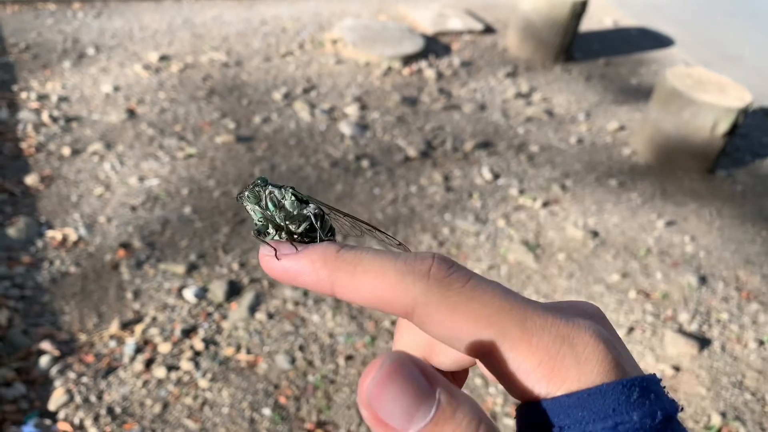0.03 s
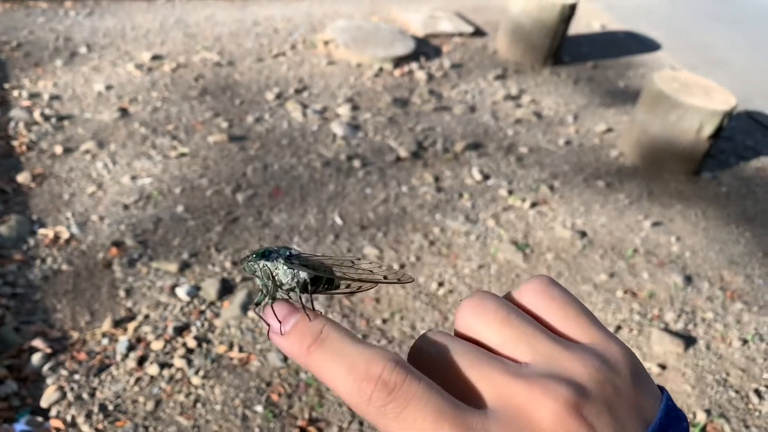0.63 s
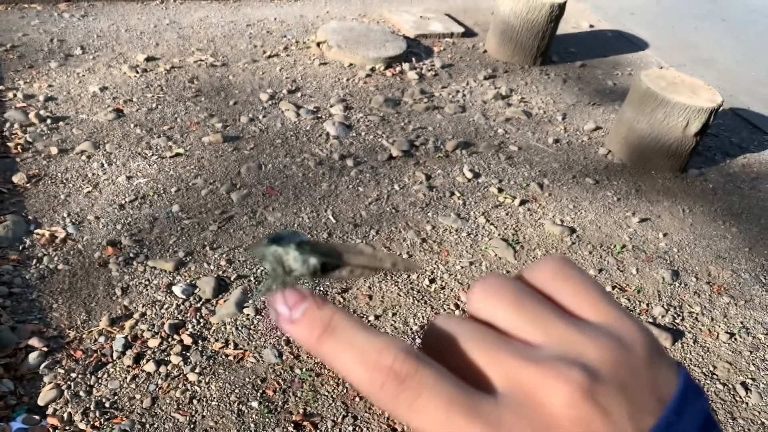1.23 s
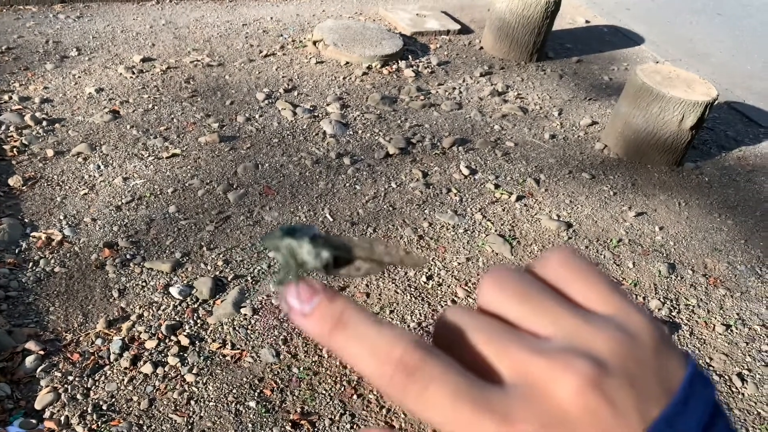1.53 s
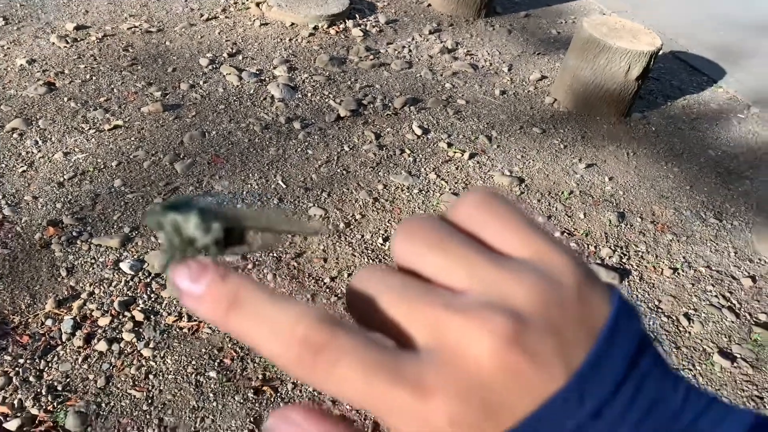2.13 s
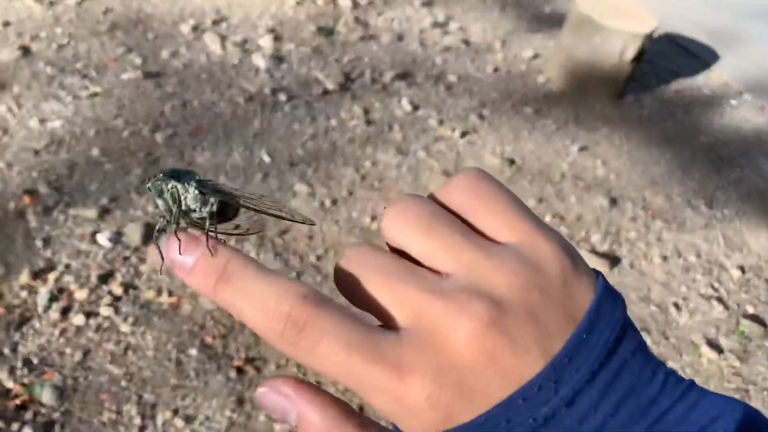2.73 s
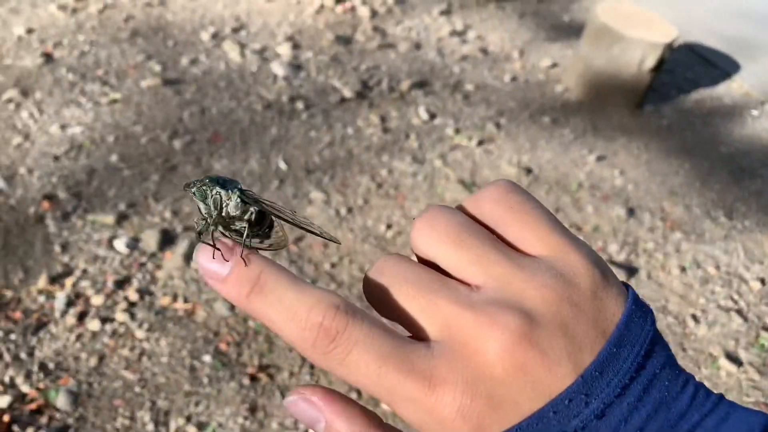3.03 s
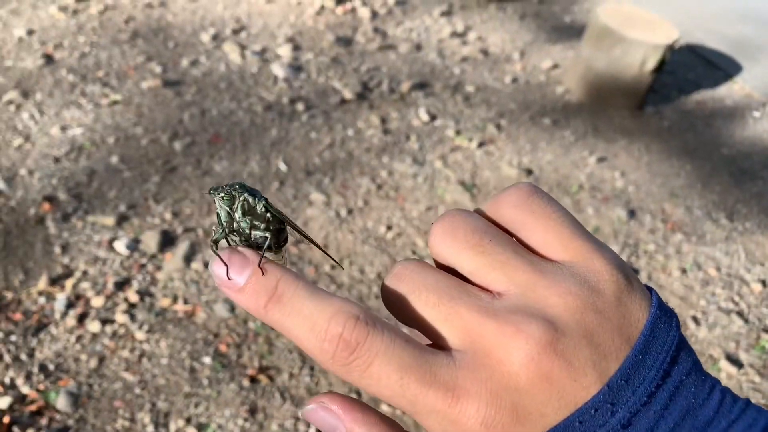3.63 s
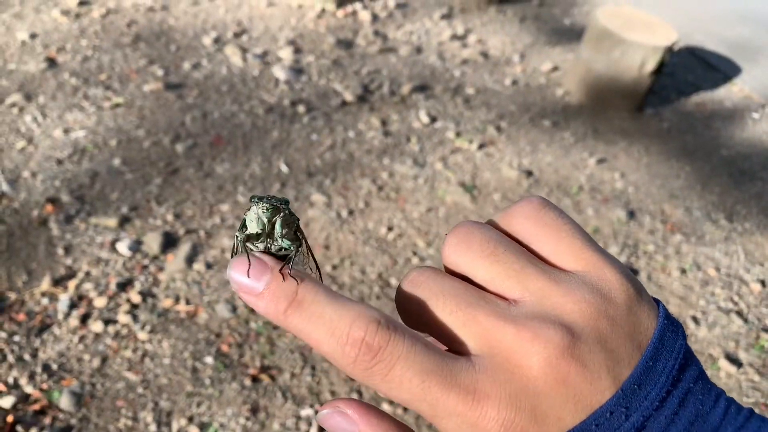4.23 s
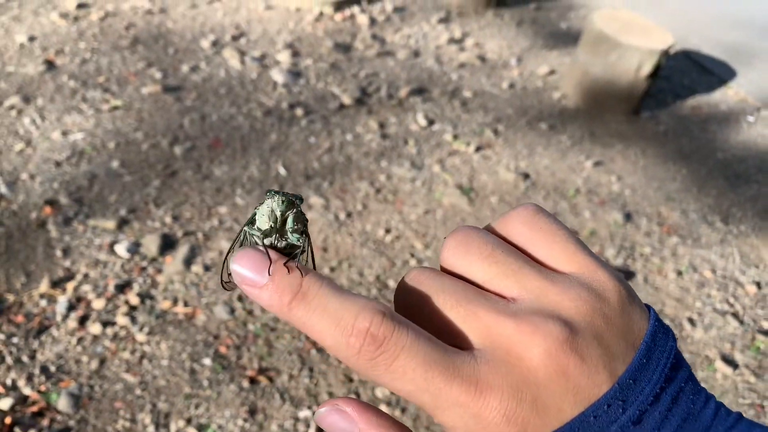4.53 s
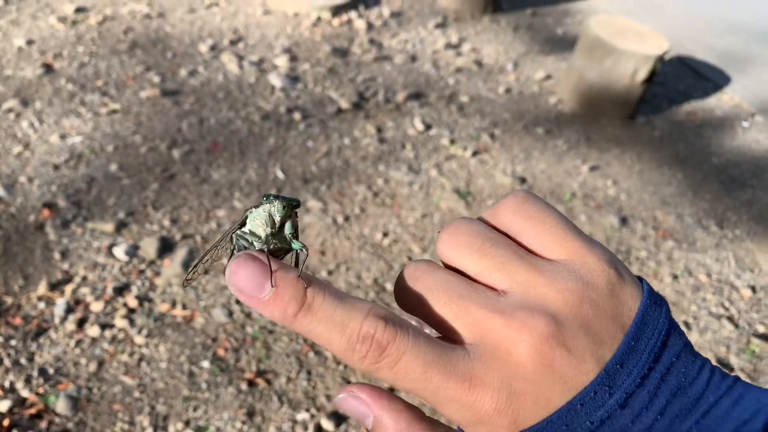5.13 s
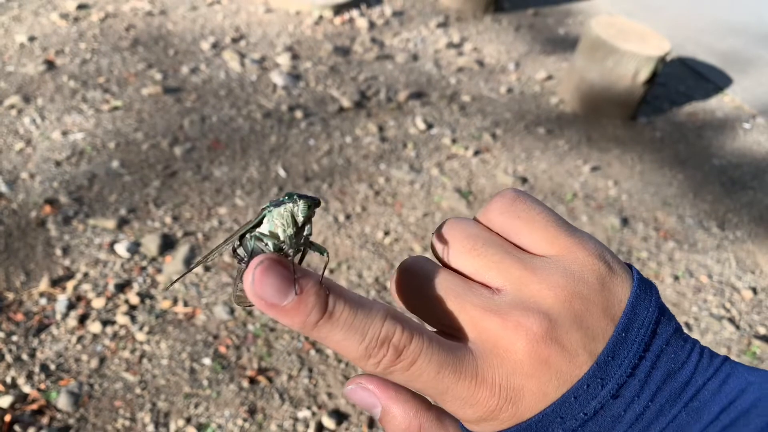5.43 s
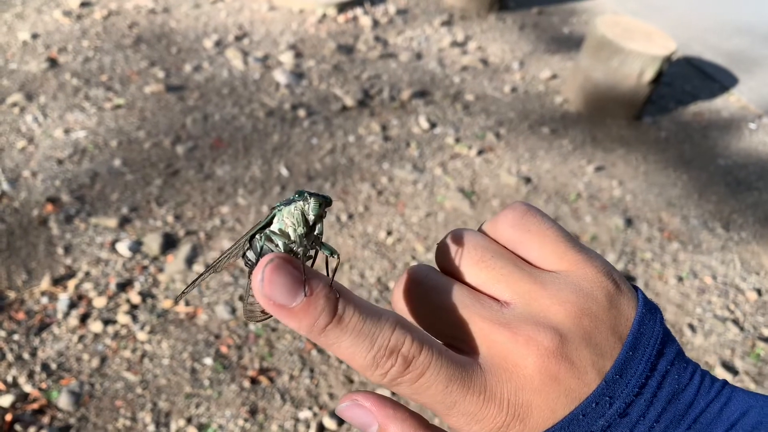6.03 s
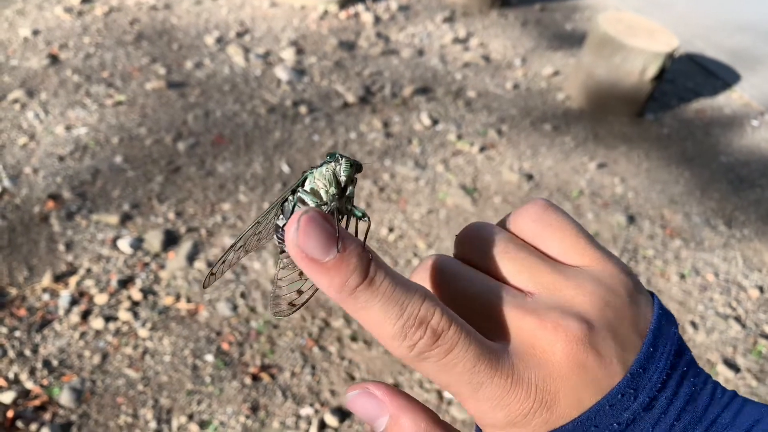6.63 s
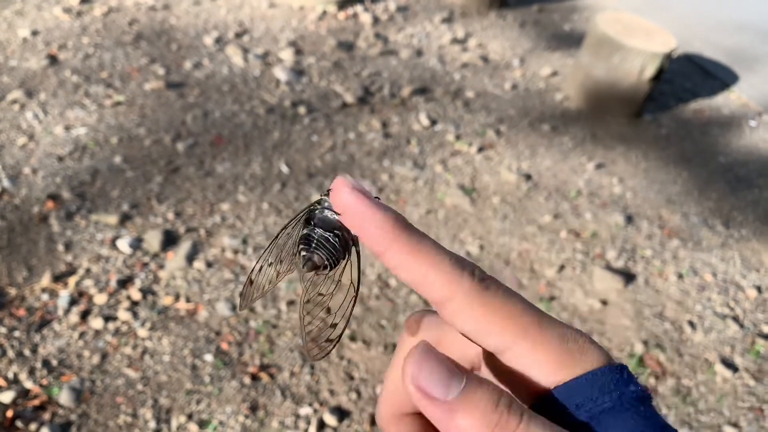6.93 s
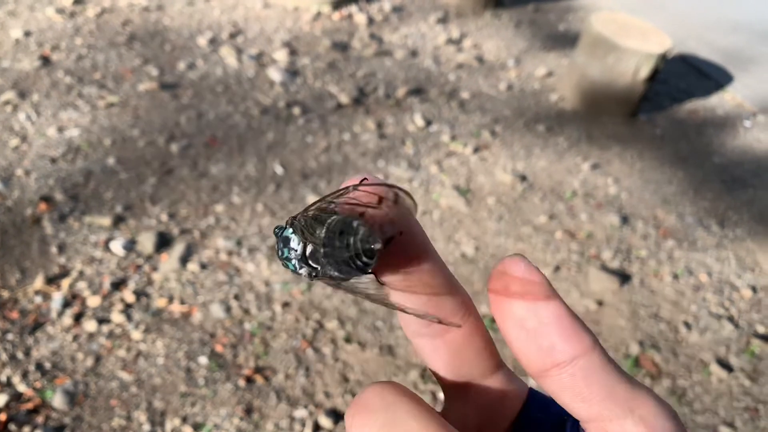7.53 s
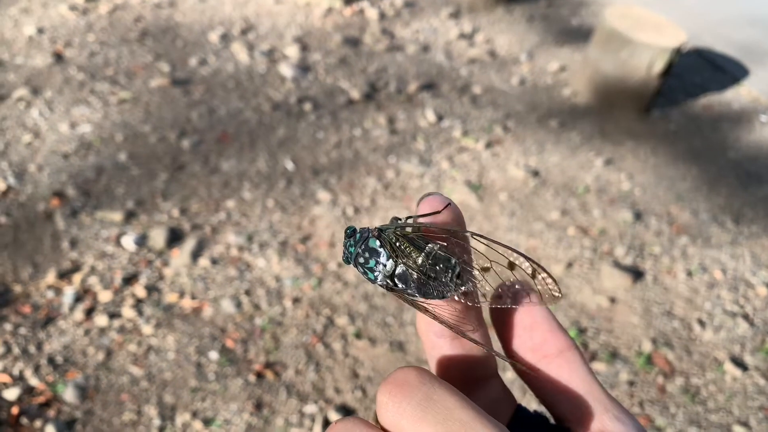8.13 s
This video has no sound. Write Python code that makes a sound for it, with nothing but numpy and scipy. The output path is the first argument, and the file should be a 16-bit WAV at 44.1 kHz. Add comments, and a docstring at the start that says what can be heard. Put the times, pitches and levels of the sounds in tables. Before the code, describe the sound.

A dense, shrill chorus of distant cicadas buzzes and hisses outdoors for the whole eight and a half seconds, over very faint low air. One cicada close by drones, swells and drones again in the first 0.7 seconds, then pauses. At 1.7 seconds a finger makes one dull knock on the microphone. From about 2.1 to 4.4 seconds the close cicada quickly alternates sizzling drones with ringing swells that glide upward, then trails off in a ragged rattle, gone by 5.6 seconds. A second cicada, a little further off, pulses five short, high sizzling bursts between 4.4 and 7.7 seconds. The close one returns at 6.6 seconds with a rising whine, then more drones and swells, with its sharpest sizzle around 8 seconds. Faint, dry microphone crackle comes and goes with the sizzling, most noticeably near the end.

```python
"""A shrill wall of summer cicadas around a gravel yard, one male close by, trading drones and swells.
His two tymbals buckle in turn. As he lifts his abdomen its ring climbs from 2.6 to 4 kHz or more;
in the drones the tymbals' bare sizzle takes over, and one song runs out in a fading rattle.
A neighbour pulses against him and a far chorus fills the air. The microphone crackles on the
sharpest sizzle, and a finger knocks its housing once."""
import sys
import numpy as np
from scipy import signal
from scipy.fft import rfft, irfft, next_fast_len
from scipy.io import wavfile
from scipy.ndimage import uniform_filter1d, minimum_filter1d

SR = 44100
rng = np.random.default_rng(int(sys.argv[2]) if len(sys.argv) > 2 else 0)


def transcribe(u):
    """Save the signal u as a 16-bit wav file named by the first command-line argument.

    u: samples, shape (n,) or (channels, n), limited to [-1, 1]; the rate is SR.
    q: integer samples, one column per channel.
    """
    v = np.clip(np.atleast_2d(u).T, -1, 1)
    q = np.round(v * 32767).astype(np.int16)
    wavfile.write(sys.argv[1], SR, q)


N = 369999
TIME = np.arange(N) / SR

# Tone curves, all with the columns: frequency_hz, relative_db
AIR_EQ = [(20, 7), (60, -1.5), (180, 1), (350, -4), (800, -7.5), (1500, -7), (4000, -28)]   # low outdoor air
CHORUS_BUZZ_EQ = [(1000, -71), (1700, -35), (2300, -25.5), (3000, -12.5), (3600, -4), (4200, 2.5),
                  (4900, 3), (5400, 1.5), (5850, -4), (6600, 2.5), (7300, -4.5), (8400, -18.5),
                  (10000, -20), (14000, -50)]   # the far males' buzz
CHORUS_SIZZLE_EQ = [(6000, -54), (8600, -25.5), (9800, -15), (10800, -8.5), (12500, -2.5), (14200, 2),
                    (15600, 2.5), (17000, 2)]   # their high sheen
CRACKLE_EQ = [(20, 6), (120, 4), (172, 7), (250, 5), (345, 2), (520, 4.5), (700, 3.5), (1500, 3.5),
              (3000, -2.5), (6000, -3.5), (12000, -14)]   # the microphone's dry crackle
NEIGHBOUR_SIZZLE_EQ = [(6000, -46), (10000, -15.5), (11300, -10), (12300, 1.5), (13300, -1), (14400, 3),
                       (15500, 4.5), (17000, -3.5)]   # the neighbour's bare tymbals
NEIGHBOUR_RING_EQ = [(2000, -54.5), (3500, -14.5), (4400, 0), (5000, -0.5), (5900, -13), (6500, -5),
                     (6950, 4.5), (7600, -26), (9000, -28)]   # his abdomen
NEAR_SIZZLE_EQ = [(6000, -65), (9300, -15), (10500, -8), (11700, 1), (13000, 1), (14300, 5.5), (15500, 4),
                  (17000, -0.5)]   # the near male's bare tymbals
NEAR_HUM_EQ = [(100, -16), (175, -28), (345, 6.5), (520, -12), (690, -2), (1030, 12), (1350, -24),
               (2000, -18), (4000, -24)]   # the reedy hum under them

# Fader moves of the far chorus: time_s, buzz_db, sizzle_db
CHORUS_LEVELS = [(0, -21.5, -17), (.45, -21, -17.5), (.9, -20.5, -17.5), (1.6, -21.3, -20),
                 (2.1, -22.5, -20.5), (2.9, -22, -19.5), (3.45, -21.5, -18), (3.85, -22.5, -16),
                 (4.3, -20, -19.5), (4.9, -21.5, -18.5), (5.35, -21.5, -19), (5.75, -21, -19),
                 (6.1, -23.3, -17), (6.4, -22.5, -20), (7.1, -22.5, -19), (7.5, -22, -16.5),
                 (7.9, -22.5, -17.5), (8.39, -21.5, -19.5)]
# Spells of microphone crackle: start_s, end_s, level_db
CRACKLE_SPELLS = [(.21, .26, -54), (0.623, 0.716, -46.5), (3.408, 3.46, -40.5), (3.479, 3.63, -46.5),
                  (3.793, 3.835, -49.5), (4.56, 4.732, -59.5), (5.299, 5.573, -44), (6.821, 7.02, -47),
                  (7.132, 7.17, -50), (7.548, 7.647, -53.5), (7.909, 8.181, -34.5), (8.3, 8.421, -46.5)]
# The neighbour's bursts of sizzle: start_s, end_s, buckles_per_s (each tymbal), level_db
NEIGHBOUR_BURSTS = [(4.357, 4.82, 167, -17.5), (5.15, 5.613, 159, -12.5), (5.858, 6.296, 155, -18),
                    (6.699, 7.071, 160, -14.5), (7.42, 7.659, 153, -13.5)]
# The near male's drones, abdomen relaxed: start_s, end_s, buckles_per_s (each tymbal), abdomen_db,
# sizzle_db, rib_ring_hz, rib_ring_db, whistle_db (relative to the sizzle)
NEAR_DRONES = [(-.1, 0.287, 177, -38.5, -14, 11840, -33, -14),
               (0.518, 0.741, 164.8, -38.5, -12.5, 14200, -27, -13),
               (2.135, 2.279, 126, -39.5, -45, 9800, -45, -20),
               (2.748, 3.107, 163, -40.5, -21.5, 10300, -33.5, -12),
               (3.332, 3.661, 164, -40.5, -13.5, 10380, -42, -6),
               (3.9, 4.219, 173.1, -43, -10, 11120, -31, -26),
               (6.591, 6.698, 171, -45, -43, 9764, -43, -20),
               (7.259, 7.649, 171.5, -38, -27, 10400, -36, -15),
               (7.88, 8.191, 159, -35.5, -6, 12270, -28, 8)]
# His swells, abdomen lifted: start_s, end_s, first_buckles_per_s, last_buckles_per_s,
# lead_cycles (how early the second tymbal comes), abdomen_hz, abdomen_db, whine_hz, whine_db,
# whine_db_per_s, upper_ring_db, top_ring_db
NEAR_SWELLS = [(0.252, 0.545, 165.9, 160, 0.026, 4630, -20.5, 4760, -22, 33, -23.5, -38),
               (2.22, 2.791, 165.5, 174.7, .021, 4330, -23.5, 4625, -17.5, -12, -21, -30),
               (3.059, 3.377, 167.7, 171.9, 0.027, 4300, -22, 4590, -24, -11, -21.5, -31.5),
               (3.622, 3.952, 172.3, 173.8, 0.021, 4460, -19, 4720, -28, -5, -20, -28),
               (4.173, 4.442, 167.2, 159.9, 0.026, 4390, -24.5, 4197, -21, -25, -28, -32),
               (6.631, 7.302, 165.4, 175, 0.014, 3998, -22.5, 4970, -15, 50, -20, -22),
               (7.604, 7.933, 170.8, 174.3, 0.016, 4310, -17, 4690, -18, 17, -27, -24),
               (8.159, 8.473, 174, 175.2, 0.018, 4520, -11.5, 4754, -22, 38, -19.5, -23)]

LIFT_S, DROP_S = .094, .08   # the abdomen rises and falls back
DRONE_FADE_S = .039


def from_db(db):
    """Decibels to gain."""
    return 10 ** (np.asarray(db) / 20)


def unit_rms(x):
    """Set the overall level to 1."""
    return x / np.sqrt(np.mean(x ** 2) + 1e-20)


def levelled(x):
    """Hold the running level at 1."""
    return x / np.sqrt(np.maximum(uniform_filter1d(x * x, size=1500), 1e-14))


def automation(rows):
    """One curve per column, in straight lines between the times in the first."""
    times, *columns = np.transpose(rows)
    return [np.interp(TIME, times, column) for column in columns]


def held(starts, values):
    """Each value lasts until the next start."""
    return values[np.maximum(np.searchsorted(starts, TIME) - 1, 0)]


def drift(turns_per_s):
    """A random wander with a spread near 1."""
    knots = rng.standard_normal(4000)
    return np.interp(TIME * turns_per_s, np.arange(len(knots)), knots)


def gate(start, end, attack_s, release_s):
    """Rise from 0, hold at 1, fall back."""
    return np.clip(np.minimum((TIME - start) / attack_s, (end - TIME) / release_s), 0, 1)


def notes(starts, ends, levels_db, attack_s, release_s, db_per_s):
    """Envelope of a row of notes; each ramps in dB, with its level set at the louder end before fades."""
    gain = np.zeros(N)
    for start, end, db, slope in np.broadcast(starts, ends, levels_db, db_per_s):
        on = slice(*np.searchsorted(TIME, [start, end]))
        growth_db = slope * (TIME[on] - (end if slope > 0 else start))
        gain[on] += gate(start, end, attack_s, release_s)[on] * from_db(db + growth_db)
    return gain


def eq(x, curve):
    """Apply a tone curve drawn on a log-frequency axis."""
    size = next_fast_len(N + 2000)
    hz, db = np.transpose(curve)
    bins_hz = np.maximum(np.arange(size // 2 + 1) * SR / size, 1)
    gain = from_db(np.interp(np.log(bins_hz), np.log(hz), db))
    return irfft(rfft(x, size) * gain, size)[:N]


def resonance(x, centre_hz, width_hz, order):
    """A ringing band whose centre may glide, held at level 1."""
    carrier = np.exp(2j * np.pi * np.cumsum(centre_hz * np.ones(N)) / SR)
    lowpass = signal.butter(order, width_hz / 2, fs=SR, output="sos")
    return levelled(np.real(carrier * signal.sosfilt(lowpass, x / carrier + 1e-18)))


def tymbals(rate, jitter_s, uneven_db, offset_cycles=.48, second_db=-3.5):
    """Left and right tymbal buckle in turn, the second one weaker; one click a buckle."""
    cycles = np.cumsum(rate) / SR
    beats = np.arange(1, int(cycles[-1]) + 1)
    train, taps = np.zeros(N), np.arange(-5, 7)
    for shift, db in ((0, 0), (offset_cycles, second_db)):
        slip, accent = rng.standard_normal((2000, 2))[:len(beats)].T
        due_s = np.interp(beats + np.interp(beats, cycles, shift * np.ones(N)), cycles, TIME)
        position = SR * (due_s + slip * np.interp(due_s, TIME, jitter_s * np.ones(N)))
        samples = position.astype(int)[:, None] + taps
        gap = samples - position[:, None]
        click = np.sinc(gap) * np.cos(np.pi * gap / len(taps))   # lands cleanly between samples
        np.add.at(train, np.clip(samples, 0, N - 1), click * from_db(db + uneven_db * accent)[:, None])
    return train


def ribs(clicks, ring_s, rough):
    """Each buckle sets the ribbed membrane crackling for about a millisecond, never quite the same."""
    fade = np.exp(-TIME[:256] / ring_s)
    # the ribs smear each click in time but leave its spectrum flat
    smear = rfft(np.roll(fade * rng.standard_normal(len(fade)), 32))
    snap = signal.oaconvolve(clicks, irfft(smear / np.abs(smear)))[32:N + 32]
    grit = signal.oaconvolve(clicks, fade)[:N] * rng.standard_normal(N)
    return unit_rms(snap) + rough * unit_rms(grit)


def small_body(x):
    """So small a body radiates little bass."""
    return signal.sosfilt(signal.butter(2, 1400, "high", fs=SR, output="sos"), x + 1e-18)


def trees(x, wet_db, decay_s=.2):
    """Ground, trunks and leaves scatter a short diffuse tail."""
    age_s = TIME[:SR // 2]
    tail = rng.standard_normal(len(age_s)) * from_db(-60 * age_s / decay_s) * (age_s > .003)
    return x + from_db(wet_db) * signal.oaconvolve(x, tail / np.linalg.norm(tail))[:N]


def air():
    """A faint, low bed of outdoor air."""
    return from_db(-64.5) * unit_rms(eq(rng.standard_normal(N), AIR_EQ))


def far_chorus(males=8):
    """Far males swell and fade at their own wandering tempos, blurred by the trees into a pitched hiss."""
    tempos = [rate * (1 + .02 * drift(2.7)) for rate in np.linspace(152, 186, males)]
    voices = sum(tymbals(rate, jitter_s=8e-6, uneven_db=4.5) * from_db(2 * drift(2.51))
                 for rate in tempos)
    crowd = levelled(unit_rms(trees(voices, wet_db=5)) + 1.03 * rng.standard_normal(N))
    buzz_db, sizzle_db = automation(CHORUS_LEVELS)
    buzz = from_db(buzz_db) * unit_rms(eq(crowd, CHORUS_BUZZ_EQ))
    sizzle = from_db(sizzle_db) * unit_rms(eq(crowd, CHORUS_SIZZLE_EQ))
    return buzz + sizzle


def finger_knock(at_s=1.719, level_db=-26.5):
    """A finger lands one dull knock on the microphone's housing."""
    tap = 1e-18 + (np.arange(N) == int(at_s * SR))
    thud = signal.lfilter(*signal.butter(1, 130, fs=SR), tap)
    thud = signal.lfilter(*signal.butter(2, 1800, fs=SR), thud)
    return from_db(level_db) * thud / thud.max()


def microphone_crackle(near_rate):
    """Spells of low, dry crackle at the tempo of whichever male is sizzling."""
    in_burst = [(TIME > start) & (TIME < end) for start, end, *_ in NEIGHBOUR_BURSTS]
    rate = np.select(in_burst, [per_s for _, _, per_s, _ in NEIGHBOUR_BURSTS], near_rate)
    pops = tymbals(rate, jitter_s=3.5e-4, uneven_db=3.5, second_db=-10)
    pops = levelled(pops * (1 + .8 * drift(400)))
    spells = notes(*np.transpose(CRACKLE_SPELLS), attack_s=.022, release_s=.022, db_per_s=14)
    return spells * unit_rms(eq(pops, CRACKLE_EQ))


def neighbour(release_s=.065, ring_s=.35, ring_db=-25):
    """A slower male, further off: bursts of tymbal sizzle, each handing over to his ringing abdomen."""
    start, end, rate, burst_db = np.transpose(NEIGHBOUR_BURSTS)
    clicks = tymbals(held(start, rate) * (1 + .012 * drift(8)), jitter_s=3e-6, uneven_db=.5)
    membrane = trees(ribs(clicks, ring_s=.0004, rough=.35), wet_db=-6)
    bursts = notes(start, end, burst_db, attack_s=.15, release_s=release_s, db_per_s=-5.5)
    tails = sum(gate(stop - release_s, stop + ring_s, attack_s=.09, release_s=.09) for stop in end)
    sizzle = bursts * levelled(eq(membrane, NEIGHBOUR_SIZZLE_EQ))
    ring = from_db(ring_db) * tails * levelled(eq(membrane, NEIGHBOUR_RING_EQ))
    return sizzle + ring


def closing_rattle(start_s=4.33, end_s=5.58, buckles_per_s=138, sag_hz_per_s=300):
    """The near song runs out in slow, ragged beats, the tymbals nearly together, as the abdomen sags."""
    rate = buckles_per_s * (1 + .015 * drift(12))
    clicks = small_body(tymbals(rate, jitter_s=1.2e-4, uneven_db=1.5, offset_cycles=.2))
    abdomen_hz = 4245 - sag_hz_per_s * np.clip(TIME - start_s, 0, 2)
    body = from_db(-21.5) * resonance(clicks, abdomen_hz, width_hz=500, order=3)
    upper = from_db(-30) * resonance(clicks, centre_hz=6860, width_hz=2500, order=3)
    return trees(gate(start_s, end_s, attack_s=.065, release_s=.87) * (body + upper), wet_db=-20)


def near_tempo(kick_per_s=6, kick_s=.08, settle_s=.17):
    """The near male's beat kicks as a swell opens, slides through it and settles in the next drone."""
    points = []
    for start, end, first, last, *_ in NEAR_SWELLS:
        points += [(start + kick_s / 10, first + kick_per_s), (start + kick_s, first)]
        points += [(end - DROP_S / 2, last)]
    for start, end, rate, *_ in NEAR_DRONES:
        points += [(min(start + settle_s, end - kick_s), rate), (end - kick_s, rate)]
    return automation(sorted(points))[0]


def abdomen_lift():
    """His abdomen drops to 0 for each drone and lifts back to 1 after it."""
    return 1 - sum(gate(start - DROP_S / 2, end + LIFT_S / 2, DROP_S, LIFT_S)
                   for start, end, *_ in NEAR_DRONES)


def drone_sizzle(clicks, release_s=.052):
    """The bare tymbals build through each drone, with a rib ring, a reedy hum and a strained whistle."""
    start, end, _, _, sizzle_db, rib_hz, rib_db, whistle_db = np.transpose(NEAR_DRONES)
    membrane = trees(ribs(clicks, ring_s=.0004, rough=.2), wet_db=-10)
    rib = resonance(membrane, held(start, rib_hz), width_hz=1000, order=2)
    rib *= notes(start, end, rib_db, DRONE_FADE_S, release_s, db_per_s=0)
    whistle = resonance(membrane, centre_hz=15470, width_hz=310, order=2)
    whistle *= from_db(held(start, whistle_db))
    sizzle = levelled(levelled(eq(membrane, NEAR_SIZZLE_EQ)) + whistle)
    hum = from_db(-48.5) * unit_rms(eq(clicks, NEAR_HUM_EQ))
    build = notes(start, end, sizzle_db, attack_s=.12, release_s=release_s, db_per_s=22.5)
    return rib + build * (sizzle + hum)


def abdomen_rings(drive, lift, drone_gain, rest_hz=2646, attack_s=.097, release_s=.098):
    """The abdomen carries the drone at rest and glides up as it lifts; higher rings join the swells."""
    (start, end, _, _, _, lifted_hz, body_db,
     whine_hz, whine_db, whine_db_per_s, upper_db, top_db) = np.transpose(NEAR_SWELLS)
    abdomen_hz = rest_hz + lift * (held(start, lifted_hz) - rest_hz)
    body = resonance(drive, abdomen_hz, width_hz=1040, order=3)
    body *= drone_gain + notes(start, end, body_db, attack_s, release_s, db_per_s=6)
    whine = resonance(drive, held(start, whine_hz), width_hz=180, order=2)
    whine *= notes(start + LIFT_S / 2, end - DROP_S / 2, whine_db, LIFT_S, DROP_S / 2, whine_db_per_s)
    upper_hz = 6544 + .05 * (abdomen_hz - 4200)   # barely follows the glide
    upper = resonance(drive, upper_hz, width_hz=425, order=2)
    upper += from_db(-20) * resonance(drive, centre_hz=9600, width_hz=270, order=2)   # its overtone
    upper *= notes(start, end, upper_db, attack_s=.079, release_s=.05, db_per_s=0)
    top = resonance(drive, centre_hz=7720, width_hz=630, order=3)
    top *= notes(start, end, top_db, attack_s, release_s, db_per_s=13)
    return body + whine + upper + top


def near_male(rate, rest_lead_cycles=.0318):
    """The lead voice: one click train drives the abdomen, the relaxed body's nasal tone and the sizzle."""
    lift = abdomen_lift()
    swell_start, _, _, _, swell_lead, *_ = np.transpose(NEAR_SWELLS)
    lead = rest_lead_cycles + lift * (held(swell_start, swell_lead) - rest_lead_cycles)
    clicks = tymbals(rate, jitter_s=2e-6, uneven_db=-.3, offset_cycles=.5 - lead, second_db=-2.6)
    buckles = unit_rms(clicks) + .07 * ribs(clicks, ring_s=.0005, rough=.3)
    drive = small_body(trees(buckles, wet_db=-10))
    start, end, _, drone_db, *_ = np.transpose(NEAR_DRONES)
    drone_gain = notes(start, end, drone_db, DRONE_FADE_S, DRONE_FADE_S, db_per_s=-10.5)
    nasal = from_db(-9) * drone_gain * resonance(drive, centre_hz=2156, width_hz=390, order=2)
    return abdomen_rings(drive, lift, drone_gain) + nasal + drone_sizzle(clicks)


def scene():
    """Air, singers and microphone noises, mixed dead centre."""
    rate = near_tempo()
    bed = air()
    singers = near_male(rate) + closing_rattle() + neighbour() + far_chorus()
    mono = bed + singers + microphone_crackle(rate) + finger_knock()
    return np.array([mono, mono])


def record(dry):
    """A quick limiter ducks the highest peaks; a steep high cut takes off the very top."""
    ceiling, cutoff_hz = .88, 15780
    gain = minimum_filter1d(ceiling / np.maximum(np.abs(dry), ceiling), size=129)
    gain = uniform_filter1d(uniform_filter1d(gain, size=65), size=65)
    return signal.sosfilt(signal.ellip(12, .2, 80, cutoff_hz, fs=SR, output="sos"), dry * gain)


dry = scene()
out = record(dry)
transcribe(out)
```